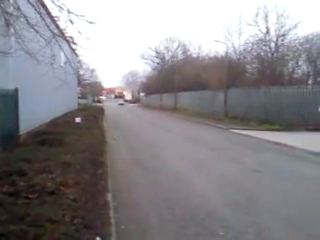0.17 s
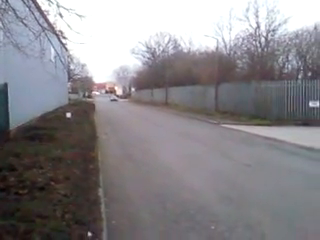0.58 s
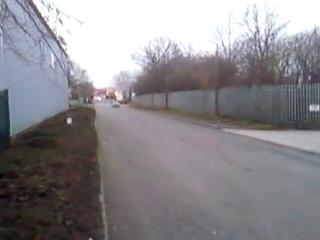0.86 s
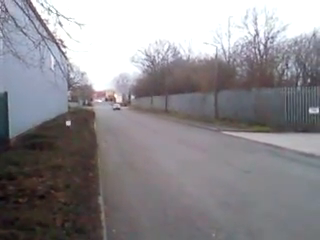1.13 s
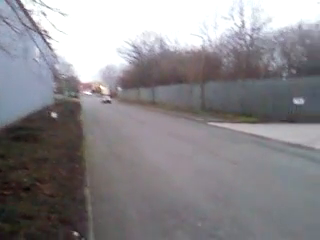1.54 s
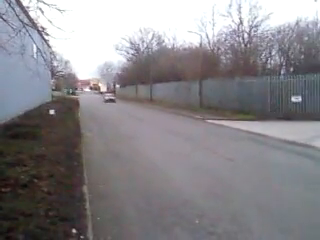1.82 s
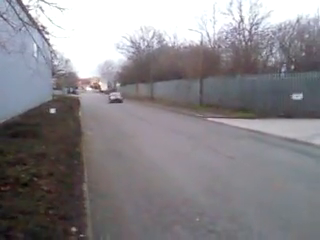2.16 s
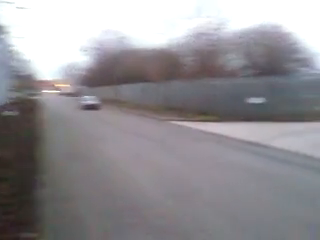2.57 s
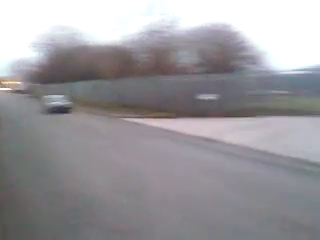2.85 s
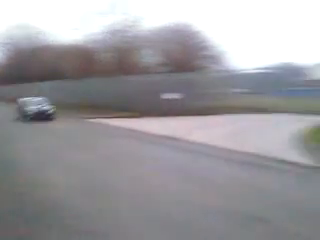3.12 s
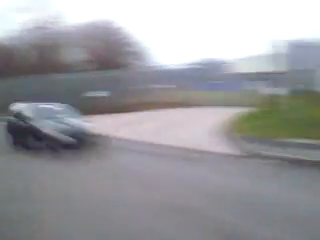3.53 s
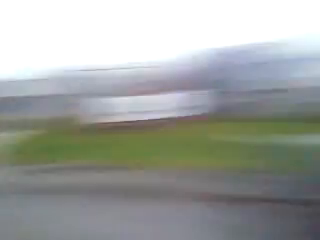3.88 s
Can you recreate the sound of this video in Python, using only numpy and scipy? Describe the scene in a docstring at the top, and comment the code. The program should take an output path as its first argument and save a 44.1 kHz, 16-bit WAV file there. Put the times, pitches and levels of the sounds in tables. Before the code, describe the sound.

Approaching car engine climbs in pitch and grows loud, rushing close by at the very end.

```python
"""A car accelerates up a road and passes close by at the very end: sines locked to one firing phase make its
exhaust note, which climbs, then drops; noise and scattered half-orders make the tyre roar and engine rasp.
Wall and road echoes comb the roar; a boom, a rush from the engine bay and low wake wind swell near the pass.
Behind it lie a humming machine (steady sines) and distant traffic (coloured noise).
The recorder has a narrow band and a fast limiter."""
import sys
import numpy as np
from scipy import signal
from scipy.fft import rfft, irfft
from scipy.io import wavfile

SR = 44100
rng = np.random.default_rng(int(sys.argv[2]) if len(sys.argv) > 2 else 0)


def materialize(psi):
    """Save the field psi as 16-bit PCM at rate SR to the path in sys.argv[1].

    A 1-D psi becomes a single channel; in a 2-D psi each row is a channel.
    """
    bounded = np.clip(np.atleast_2d(psi).T, -1, 1)
    quanta = np.round(bounded * 32767).astype(np.int16)
    wavfile.write(sys.argv[1], SR, quanta)


N = 176400
T = np.arange(N) / SR  # s
SPEED_OF_SOUND_M_PER_S = 343
PULSING = 0.15  # depth of noise modulation at the firing rate

# base level of roar and exhaust orders: [t/s, level/dB]
ROAR_LEVEL = [(0, -29.5), (.3, -28.5), (.6, -26), (1, -23.5), (1.4, -21), (1.7, -21), (2.1, -19.5),
              (2.55, -18.5), (2.8, -17.5), (3.1, -14), (3.3, -10.5), (3.7, -7), (4, -9)]
# roar and rasp colour, car far off: [f/Hz, density/dB]
FAR_COLOUR = [(40, -37), (80, -14), (150, -0.5), (330, -5.5), (480, -11), (760, -2), (950, -4), (1220, 4),
              (1650, -2), (2150, -2), (2550, -10), (3200, -12), (3550, -26), (3900, -52)]


def from_db(db):
    """Decibels to amplitude gain."""
    return 10 ** (np.asarray(db) / 20)


def rms_one(x):
    """Scale to unit power."""
    return x / np.sqrt(np.mean(np.abs(x) ** 2) + 1e-20)


def in_time(rows):
    """Join [t/s, value] rows by straight lines over T."""
    return np.interp(T, *np.transpose(rows))


def at_hz(points, hz):
    """Read a [f/Hz, dB] curve on a log-frequency axis."""
    f, db = np.transpose(points)
    return np.interp(np.log(hz + 1e-9), np.log(f), db)


def drift(rate_hz):
    """Slow random signal of spread 1: white noise through a double pole at rate_hz."""
    step = 40  # computed on every 40th sample
    settle = 2000
    r = np.exp(-2 * np.pi * rate_hz * step / SR)
    white = rng.standard_normal(N // step + 2 + settle)
    slow = signal.lfilter([1], [1, -2 * r, r * r], white)[settle:]
    return np.interp(np.arange(N) / step, np.arange(len(slow)), rms_one(slow))


def noise(colour):
    """Gaussian noise of given colour and unit power."""
    hz = np.arange(N // 2 + 1) * SR / N
    spectrum = rfft(rng.standard_normal(N)) * from_db(at_hz(colour, hz))
    return rms_one(irfft(spectrum, N))


def scattered_tone(phase, width_hz):
    """Tone spread into a narrow band by independent drifts of its sine and cosine parts."""
    return drift(width_hz) * np.sin(phase) + drift(width_hz) * np.cos(phase)


def with_echo(x, lag_s, gain):
    """Add one reflection of moving lag; normalise for uncorrelated power."""
    echo = np.interp(T - lag_s, T, x)
    return (x + gain * echo) / np.sqrt(1 + gain ** 2)


def exhaust(phase, firing_hz, near):
    """Firing note, rougher close by, plus weaker orders coloured by the pipe resonances."""
    # firing note: [t/s, level/dB]
    note_level = [(0, -28.5), (.12, -32.5), (.6, -30.5), (1, -26.5), (1.6, -22), (2.05, -23), (2.22, -32),
                  (2.52, -28), (2.7, -16.5), (3.2, -17), (3.6, -15.5), (3.71, -30), (3.8, -4.5),
                  (3.88, -19), (4, -32)]
    # overtones and drive whines: [multiple of firing rate, level/dB re roar level]
    orders = [(.41, -34), (.83, -18), (2, -20), (2.5, -22), (2.78, -26.5), (3, -17.5), (3.5, -20),
              (4, -16.5), (4.08, -16.5), (5, -15.5)]
    # pipe resonances: [f/Hz, gain/dB]
    pipe = [(150, 1.5), (320, -2), (385, 0.5), (460, -4.5), (520, 6), (570, 0.5), (620, 1), (690, 1),
            (750, -10.5), (800, 3.5), (930, -14)]
    fade_db, fade_hz = 1.23, 21
    rough_db, rough_hz = 5.5, 22  # depth scaled by near
    orders_near_db = -7

    waver_db = fade_db * drift(fade_hz) + rough_db * near * drift(rough_hz)
    note = np.sin(phase) * from_db(in_time(note_level) + waver_db)
    overtones = 0
    for k, db in orders:
        gain = from_db(db + at_hz(pipe, k * firing_hz))
        overtones = overtones + gain * np.sin(k * phase + 2 * np.pi * rng.random())
    overtones = overtones * from_db(in_time(ROAR_LEVEL) + orders_near_db * near)
    return np.sqrt(2) * (note + overtones)


def rasp(phase, firing_hz):
    """Dense upper half-orders of the engine, each scattered along the road into a narrow band."""
    level_db, width_hz = -7.5, 3.7  # level re rush
    out = 0
    for k in np.arange(5.5, 17, .5):
        out = out + scattered_tone(k * phase, width_hz) * from_db(at_hz(FAR_COLOUR, k * firing_hz))
    return from_db(level_db) * rms_one(out)


def roar(phase, firing_hz, near):
    """Tyre and pulsing engine noise, changing colour on approach, combed by wall and road reflections."""
    # colour close by: [f/Hz, density/dB]
    near_colour = [(40, -22.5), (85, -8.5), (200, 0.5), (400, -1), (600, -4), (850, 1.5), (1250, 1),
                   (1600, 4.5), (2100, -6), (2600, -4), (3600, -6), (3900, -26), (4300, -33.5)]
    # wall echo: [t/s, lag/ms]
    wall_lag = [(0, 1.41), (.7, 1.39), (1.5, 1.8), (2.5, 1.66)]
    pass_s, speed_m_per_s, miss_m = 3.89, 16, 3.1
    source_height_m, mic_height_m = 0.47, 1.604
    wall_gain, ground_gain, ground_range_m = .22, .75, 2.7
    flutter_db, flutter_hz = 0.76, 30

    rush = np.sqrt(1 - near) * noise(FAR_COLOUR) + np.sqrt(near) * noise(near_colour)
    x = rms_one(rush * (1 + PULSING * np.sin(phase)) + rasp(phase, firing_hz))

    distance_m = np.hypot(miss_m, speed_m_per_s * (T - pass_s))
    direct_m = np.hypot(distance_m, mic_height_m - source_height_m)
    bounced_m = np.hypot(distance_m, mic_height_m + source_height_m)
    ground_lag_s = (bounced_m - direct_m) / SPEED_OF_SOUND_M_PER_S
    x = with_echo(x, in_time(wall_lag) / 1000, wall_gain * (1 - near))
    x = with_echo(x, ground_lag_s, ground_gain / (1 + (distance_m / ground_range_m) ** 2))
    return x * from_db(in_time(ROAR_LEVEL) + flutter_db * drift(flutter_hz))


def engine_bay(phase):
    """Pulsing noise thrown forward through the grille, in a Gaussian swell before the pass."""
    # colour: [f/Hz, density/dB]
    bay_colour = [(700, -36), (1200, -4), (1500, -4), (1950, 2), (2250, 0), (2600, -15.5), (3600, -64.5)]
    level_db, peak_s, spread_s = -15, 3.24, 0.54
    swell = np.exp(-.5 * ((T - peak_s) / spread_s) ** 2)
    return from_db(level_db) * swell * noise(bay_colour) * (1 + PULSING * np.sin(phase))


def turbulence(x):
    """Moving air fades each of 12 overlapping bands a little on its own."""
    fade_db, fade_hz = 1.6, 12
    spectrum = rfft(x)
    hz = np.arange(N // 2 + 1) * SR / N
    centres_hz = np.geomspace(250, 3500, 12)
    out = 0
    for weights in np.eye(len(centres_hz)):
        band = irfft(spectrum * np.interp(hz, centres_hz, weights), N)
        out = out + band * from_db(fade_db * drift(fade_hz))
    return out


def boom(phase):
    """Body and exhaust-box boom: a rough narrow band just above the firing note."""
    # boom, heard close by: [t/s, level/dB]
    boom_level = [(2.5, -39), (3.05, -44.5), (3.3, -16.5), (3.55, -18.5), (3.78, -17.5), (4, -25.5)]
    ratio, width_hz = 1.17, 24
    return scattered_tone(ratio * phase, width_hz) * from_db(in_time(boom_level))


def wake():
    """Low wind of the wake: noise rising at a constant dB rate, then held."""
    # colour: [f/Hz, density/dB]
    wake_colour = [(20, -37), (50, -18), (85, -3.5), (150, -5), (260, -13), (600, -13.5), (2000, -82.5)]
    full_db, full_s, rise_db_per_s = -17.5, 3.95, 22.5
    return noise(wake_colour) * from_db(full_db - rise_db_per_s * np.maximum(full_s - T, 0))


def hum():
    """Distant machine: near-steady sine lines."""
    # lines: [f/Hz, level/dB]
    lines = [(75.3, -42), (225.9, -37.5), (301.2, -46), (376.5, -43.5)]
    fade_db, fade_hz = 0.1, 0.67
    out = 0
    for hz, db in lines:
        tone = np.sin(2 * np.pi * (hz * T + rng.random()))
        out = out + tone * from_db(db + fade_db * drift(fade_hz))
    return np.sqrt(2) * out


def traffic():
    """Distant traffic: stationary coloured noise."""
    # colour: [f/Hz, density/dB]
    traffic_colour = [(25, -16), (60, -3.5), (130, -0.5), (300, 2), (480, 2.5), (780, 1), (950, -5),
                      (1400, -6.5), (2500, -23), (4000, -62.5)]
    level_db = -34
    return from_db(level_db) * noise(traffic_colour)


def scene():
    """One firing phase drives the tonal and pulsing layers of the car; wake and background are added."""
    # firing rate as heard, Doppler shift included: [t/s, f/Hz]
    firing = [(0, 158.9), (.25, 155.2), (.5, 159.1), (.75, 163.7), (1, 169.9), (1.25, 174.4), (1.5, 182.4),
              (2, 194), (2.5, 205.4), (2.75, 210.9), (3, 215.4), (3.25, 220.8), (3.6, 217.3), (3.8, 213.2),
              (3.9, 199), (4, 171.5)]
    jitter, jitter_hz = 0.002985, 12  # jitter: fraction of firing rate
    near_from_s, near_by_s = 1.53, 3.79

    firing_hz = in_time(firing)
    phase = 2 * np.pi * np.cumsum(firing_hz * (1 + jitter * drift(jitter_hz))) / SR
    near = np.clip((T - near_from_s) / (near_by_s - near_from_s), 0, 1) ** 2  # 0 far, 1 close
    through_air = turbulence(roar(phase, firing_hz, near) + engine_bay(phase))
    car = exhaust(phase, firing_hz, near) + through_air + boom(phase)
    return (car + wake() + hum() + traffic())[None]


def limiter(x):
    """Gain drops at once for a peak above the ceiling, then recovers at a constant dB rate."""
    ceiling, release_db_per_s = .705, 1500
    over_db = 20 * np.log10(np.maximum(np.abs(x) / ceiling, 1))
    ramp_db = release_db_per_s * T
    held_db = np.maximum.accumulate(over_db + ramp_db)
    return x * from_db(ramp_db - held_db)


def record(dry):
    """Narrow-band low-pass, fast limiter, then a second low-pass."""
    band_edge_hz, cutoff_hz = 4050, 15900
    narrow = signal.ellip(10, .3, 90, band_edge_hz, fs=SR, output="sos")
    top_cut = signal.ellip(10, .1, 80, cutoff_hz, fs=SR, output="sos")
    x = limiter(signal.sosfilt(narrow, dry[0]))
    return signal.sosfilt(top_cut, x)[None]


dry = scene()
out = record(dry)
materialize(out)
```